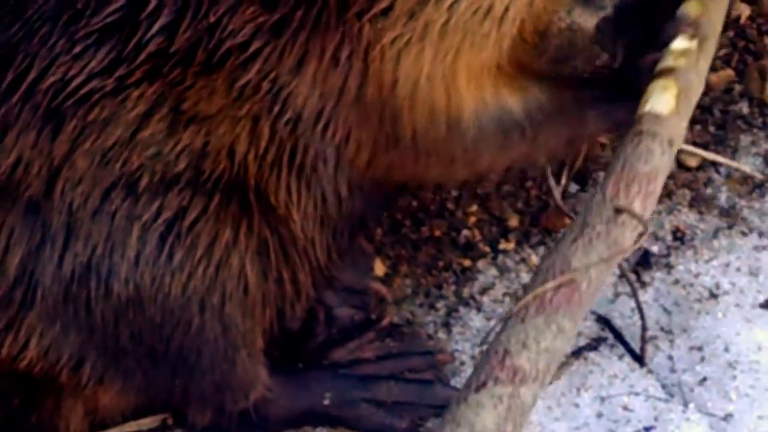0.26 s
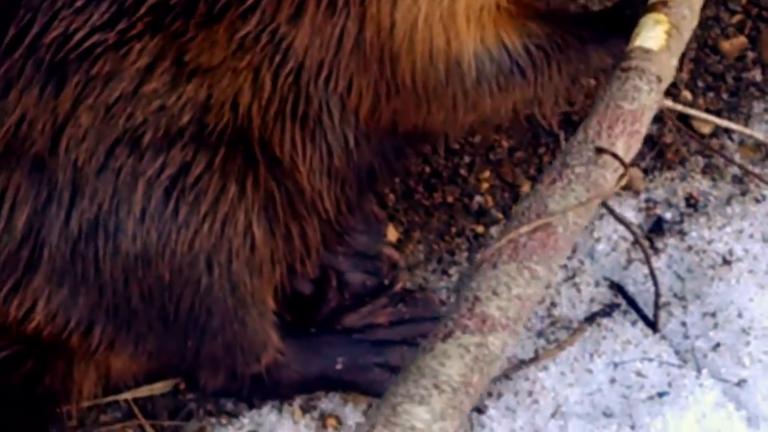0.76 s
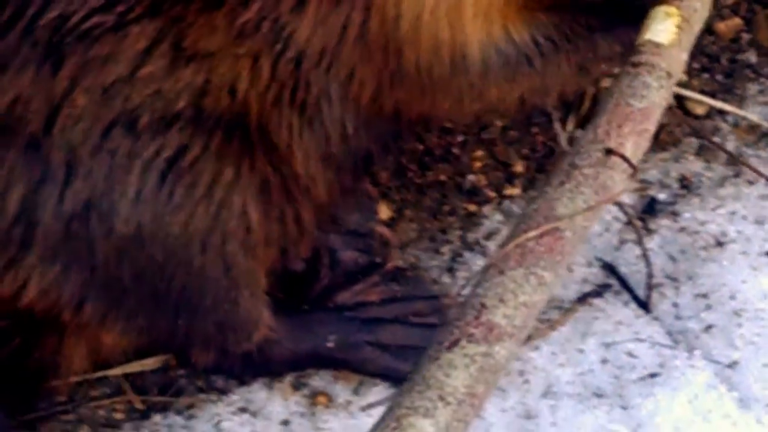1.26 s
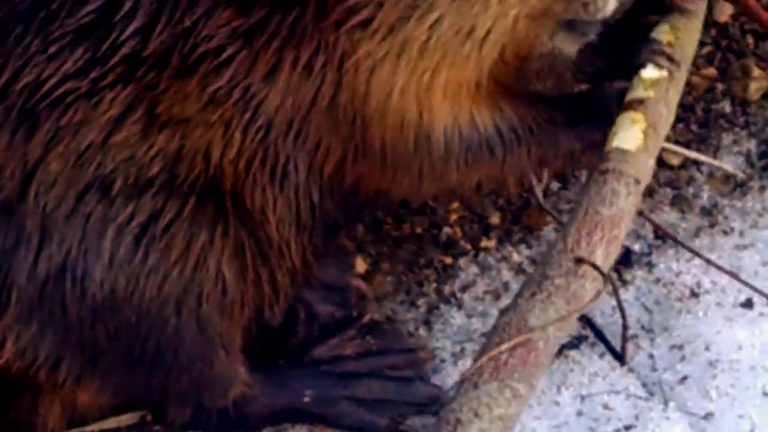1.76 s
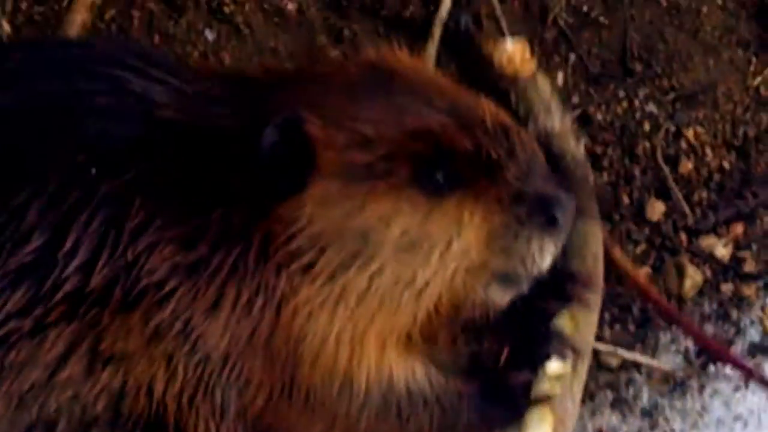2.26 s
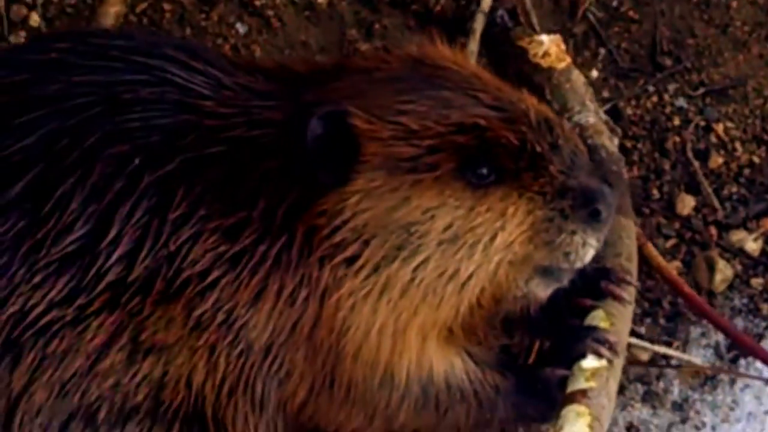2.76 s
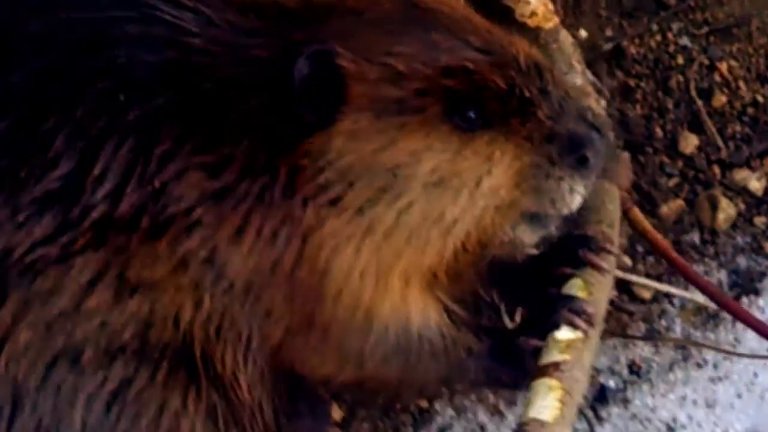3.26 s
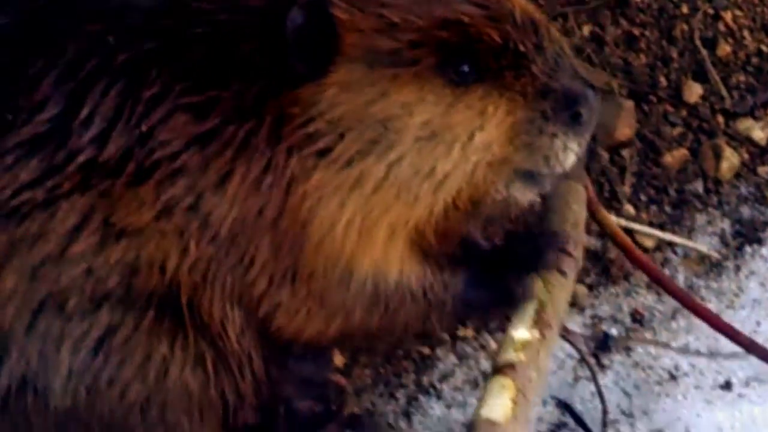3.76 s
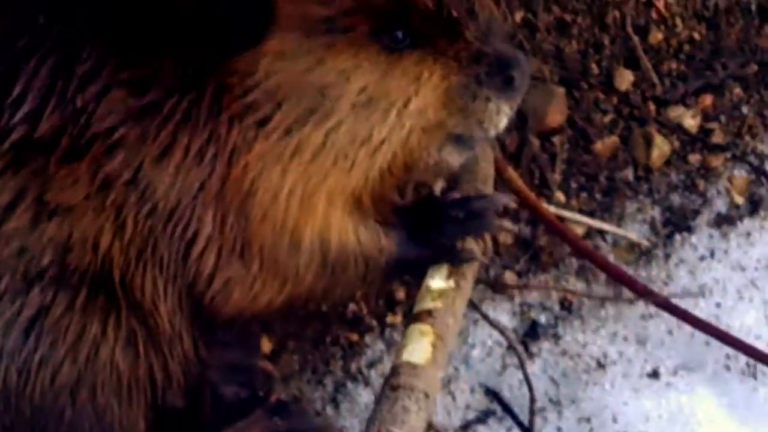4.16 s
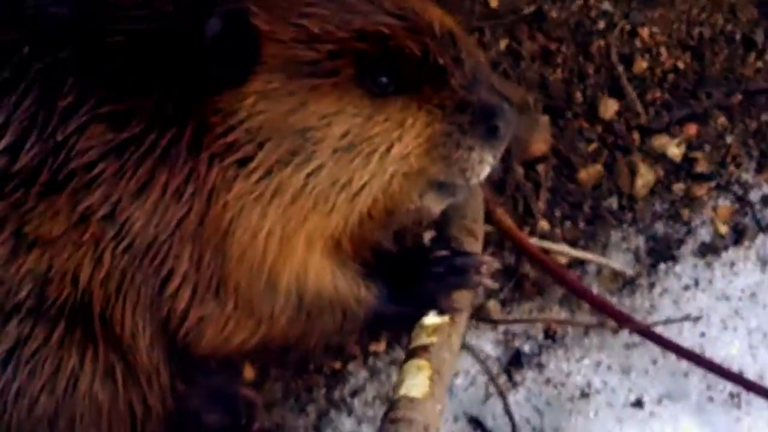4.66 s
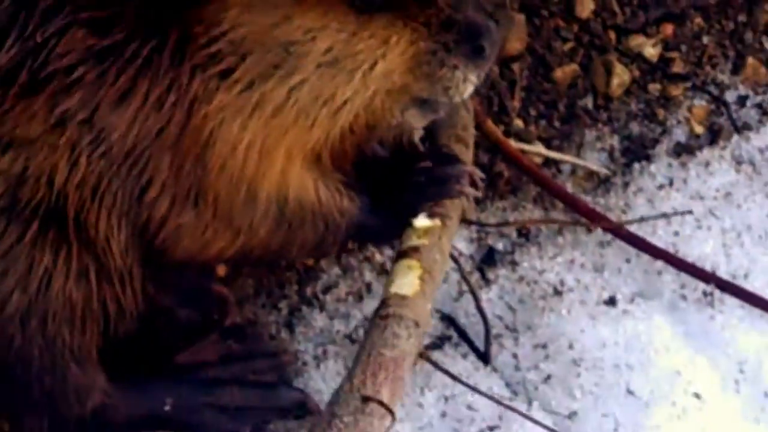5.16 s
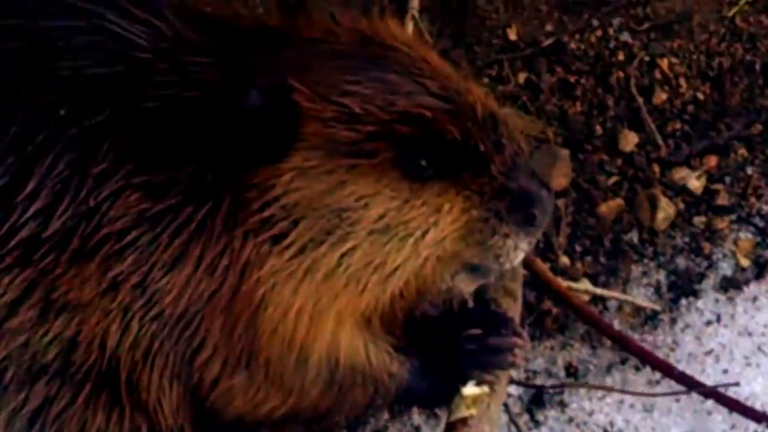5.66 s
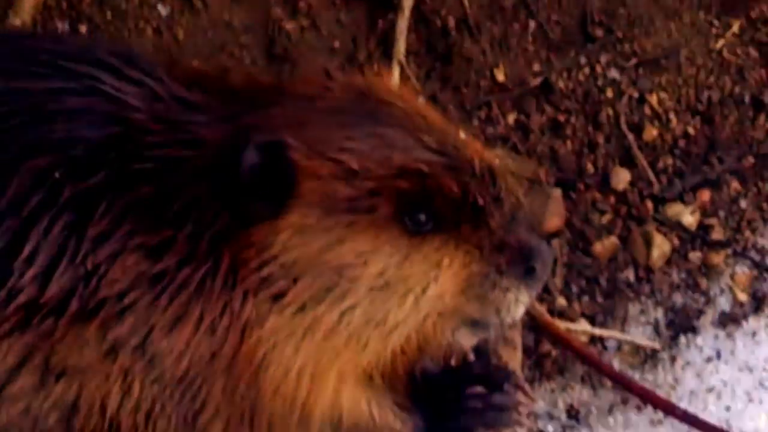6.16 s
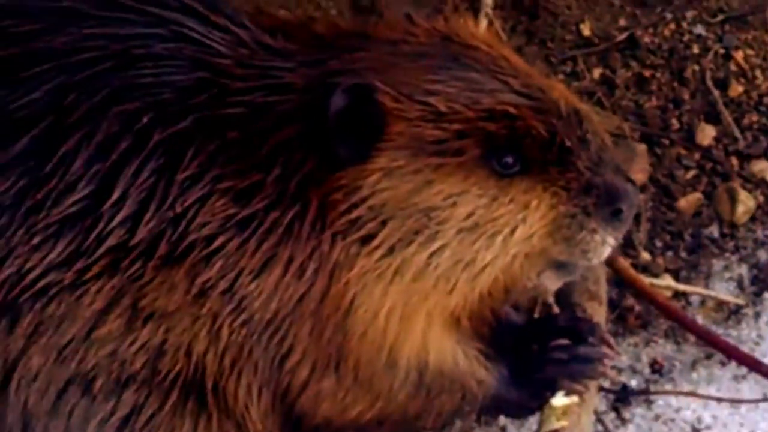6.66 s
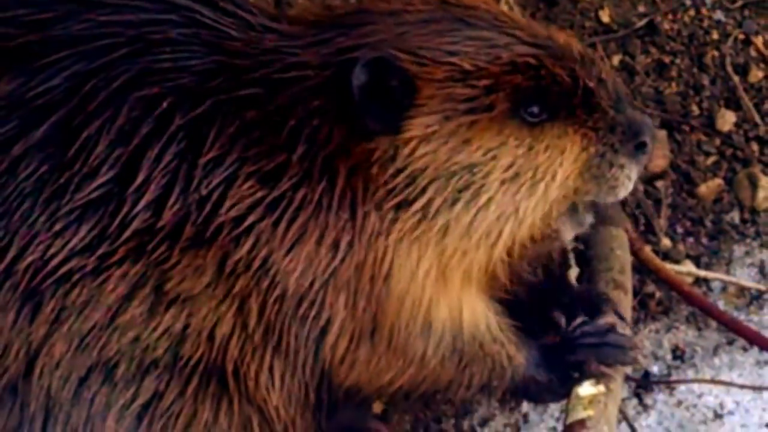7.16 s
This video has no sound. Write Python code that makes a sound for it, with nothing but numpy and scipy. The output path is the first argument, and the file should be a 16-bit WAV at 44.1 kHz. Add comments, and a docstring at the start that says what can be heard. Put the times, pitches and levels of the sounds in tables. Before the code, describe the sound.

Close to the microphone, a beaver gnaws a branch on a snowy bank. A soft quick tearing opens, then mostly quiet with tiny ticks. Midway comes a dense run of bright, dry crunches and snaps, followed by smaller nibbles and scattered tooth clicks. Behind it lie steady hiss, low rumble, a wavering far engine and a few faint bird chirps. Open air, nearly no echo.

```python
"""Crunching, snapping and clicking, close by: a beaver gnaws the bark of a branch on a snowy bank.
Each bite tears a run of tiny random fibre breaks; larger bundles snap in ragged bursts.
Teeth and claws click as impulses with a brief ring; breaks and clicks also drive the branch's resonances.
Behind: a few faint gliding bird chirps, a far engine's tones with a whine and drone in narrow noise,
a brief early low swell with a weaker return, a rumble, distant noise and steady outdoor hiss."""
import sys
import numpy as np
from scipy import signal
from scipy.fft import rfft, irfft, next_fast_len
from scipy.io import wavfile

SR = 44100
rng = np.random.default_rng(int(sys.argv[2]) if len(sys.argv) > 2 else 0)


def wrap_up_sound(samples):
    """Save the sound to the file named by the first command line argument, as 16-bit audio."""
    columns = np.atleast_2d(samples).T
    # keep every value between -1 and 1, then stretch to whole-number steps
    tamed = np.clip(columns, -1, 1)
    steps = np.round(tamed * 32767).astype(np.int16)
    wavfile.write(sys.argv[1], SR, steps)


N = 326781
TIME = np.arange(N) / SR
SIZE = next_fast_len(N + SR // 2, True)
HZ = np.maximum(np.arange(SIZE // 2 + 1) * SR / SIZE, 1)
LEFT_DB, LEFT_LOW_DB = -2, -3.5  # left channel: beaver, most of the background


# fibre snaps: [t/s, relative crack level/dB, relative branch level/dB]
SNAPS = [(0.159, -42, -33), (0.164, -38, -44), (0.1725, -28, -32.5), (0.1755, -36, -28.5),
         (0.182, -43, -46), (0.236, -48, -43), (0.2573, -48, -53), (0.3124, -48.5, -44), (0.3444, -49, -47),
         (0.3745, -42.5, -54), (2.0408, -42, -68), (3.1861, -40, -52.5), (3.2072, -34, -59),
         (3.2668, -47, -41), (3.3636, -47.5, -58), (3.405, -34, -33), (3.4113, -34, -40),
         (3.4185, -28, -37), (3.4317, -36, -46), (3.4378, -19.5, -26.5), (3.4446, -33, -32),
         (3.4578, -23, -25), (3.4676, -31, -34), (3.4821, -32, -39), (3.4923, -28, -39), (3.5077, -33, -42),
         (3.537, -43, -45), (3.547, -38, -50), (3.555, -33, -48), (3.5754, -28.5, -47), (3.5974, -35, -30),
         (3.604, -38, -27), (3.611, -31, -40), (3.6304, -28, -48), (3.6551, -28, -45), (3.6695, -25, -40),
         (3.6819, -34, -36), (3.7151, -23, -40), (3.7215, -28, -38), (3.73, -30, -28.5),
         (3.7674, -26.5, -34.5), (3.787, -40, -55), (3.8281, -46, -48), (3.8402, -46, -56),
         (3.8577, -43, -54), (3.8713, -25, -51), (3.8892, -31, -34.5), (3.9044, -28.5, -37),
         (3.9149, -26, -34), (3.9225, -20, -39), (3.935, -31, -43), (3.9675, -41, -49), (3.9902, -34, -35),
         (3.997, -17.5, -30), (4.035, -22, -31), (4.0551, -32, -54), (4.0666, -26, -46), (4.0732, -31, -47),
         (4.0925, -42, -47), (4.116, -19.5, -34.5), (4.1462, -22.5, -38), (4.22, -22, -44),
         (4.256, -31, -42), (4.2735, -23, -45), (4.2852, -37, -44), (4.2984, -39, -54), (4.3255, -25, -33),
         (4.337, -18, -31), (4.361, -27, -41.5), (4.3803, -25, -49), (4.404, -27, -33),
         (4.4171, -27, -37.5), (4.4297, -38, -40), (4.4653, -32, -49), (4.4752, -33, -41),
         (4.483, -32, -54), (4.5068, -44, -52), (4.535, -42, -57), (4.558, -37, -42), (4.5798, -23.5, -32),
         (4.587, -33, -42), (4.6218, -32, -47), (4.6517, -42, -57), (4.673, -29, -44), (4.6868, -36, -46),
         (4.6942, -30, -40), (4.7245, -41, -50), (4.7342, -37, -53), (4.7691, -38, -52),
         (4.7845, -27.5, -44.5), (5.1002, -38, -42), (5.1109, -40, -56), (5.1255, -37, -43),
         (5.1425, -45, -42), (5.1756, -44, -55), (5.1875, -25, -37), (5.197, -29, -50), (5.2874, -38, -57),
         (5.3135, -32, -46), (5.3326, -45, -53), (5.3403, -37, -37), (5.3488, -30, -44)]
# teeth and claws on wood: [t/s, relative crack level/dB, relative branch level/dB, ring f/Hz]
CLICKS = [(0.0961, -37, -57, 6120), (0.1122, -37, -48, 6060), (0.117, -41, -55, 8400),
          (0.1246, -46, -58, 6600), (0.4776, -46, -47, 6900), (0.7605, -41.5, -64, 7920),
          (0.9783, -41, -57, 9300), (1.0045, -42, -59, 7410), (1.0998, -31.5, -63, 9470),
          (1.1168, -42, -65, 9000), (1.3584, -46, -58, 8800), (1.8176, -50, -68, 7050),
          (2.0581, -43, -62, 5080), (2.1721, -41, -69, 9130), (2.62, -45, -49, 7300),
          (2.9688, -44.5, -70, 9470), (3.077, -39, -50, 9900), (3.1228, -40.5, -60, 9500),
          (3.2884, -35, -44, 7200), (3.324, -37, -52, 6900), (4.9547, -43, -65, 8000),
          (4.9712, -40, -51, 7560), (5.262, -33, -38.5, 7960), (5.2778, -26.5, -44, 8100),
          (5.297, -35, -41, 7700), (5.5825, -42, -57, 8300), (5.7078, -42, -56, 9500),
          (5.9565, -41, -58, 6460), (6.0125, -43, -58, 7800), (6.0398, -36, -50, 5000),
          (6.125, -53, -48, 2600), (6.5946, -49.5, -62, 9000), (6.908, -47, -61, 8500),
          (6.938, -37, -53, 9130), (6.9531, -34, -51, 6550), (6.9676, -26.5, -27, 6340),
          (7.226, -32.5, -48, 6450), (7.2873, -42, -65, 6260), (7.3673, -48, -64, 9000)]
# colour of breaking fibres: [f/Hz, relative level/dB]
FIBRE_COLOUR = [(1200, -10.5), (2200, -23), (4000, -21.5), (6300, -16.5), (8000, -11.5), (10000, -5.5),
                (12000, 1), (13300, 3.5), (14700, 9), (15400, 9.5), (15800, -39), (16200, -80)]
# branch resonances: [f/Hz, width/Hz, relative level/dB]
BRANCH_MODES = [(1610, 760, 8), (2268, 120, 12.5), (2870, 170, 10.5), (4100, 8700, 2.5), (6680, 2500, 10),
                (9300, 490, 11.5), (3210, 54, 6), (3350, 63, 5), (3835, 43, 8), (4000, 20, 5),
                (4240, 74, 9), (4530, 52, 9), (5760, 95, 5.5), (7210, 99, 15)]
TEAR_DB, SNAP_DB, CLICK_DB = 1.2, -0.5, 13.5  # heard directly
SNAP_PUSH_DB, CLICK_PUSH_DB = -8, 8  # through the branch
SLIVER_DB, SPLIT_DB = -16.5, -23  # ringing slivers: under branch level, under crack level
SCATTER_CRACK_DB = -5.5
WOOD_CUT_HZ = 9200  # the soft branch loses the highest treble


def beaver(scatter_db):
    """All breaks sound directly and also shake the branch."""
    force, shake = jaw()
    tear = tearing(force)
    bundles = np.vstack([SNAPS, thin_snaps(force)])
    snap, snap_push = snaps(bundles)
    contacts = np.vstack([CLICKS, ticks()])
    click, click_push, rings = clicks(contacts, splinter_s=.0011, splinter_db=-10, ring_s=0.0005, ring_db=11)

    cracks = from_db(TEAR_DB) * force * tear + from_db(SNAP_DB) * snap
    pushes = shake * tear + from_db(SNAP_PUSH_DB) * snap_push
    click = from_db(CLICK_DB) * click
    click_push = from_db(CLICK_PUSH_DB) * click_push

    s, crack_db, branch_db = bundles.T
    slivers = splinters(s, branch_db + SLIVER_DB, low_hz=1900, high_hz=7000, t60=.03, count=5)
    slivers += splinters(s, crack_db + SPLIT_DB, low_hz=11300, high_hz=13600, t60=.035)

    fibre = causal(FIBRE_COLOUR)
    softness = 1 + 1j * HZ / WOOD_CUT_HZ - (HZ / WOOD_CUT_HZ) ** 2
    branch = resonances(BRANCH_MODES) / softness
    bark = tinted(through(cracks, fibre), step_hz=1500, spread_db=2.8, change_hz=50)
    wood = tinted(through(pushes, branch), step_hz=300, spread_db=4.5, change_hz=14)
    knocks = through(click, fibre) + through(click_push, branch) + rings
    direct = pair(bark + wood + slivers + knocks, LEFT_DB)

    sides = []
    for _ in "LR":
        crack_tail = from_db(SCATTER_CRACK_DB) * through(scattered(cracks + click), fibre)
        branch_tail = through(scattered(pushes + click_push), branch)
        sides.append(crack_tail + branch_tail)
    return direct + from_db(scatter_db) * np.array(sides)


# tooth strokes: [full grip t/s, length/s, force level/dB, force lost by the end/dB, branch re force/dB]
BITES = [(0.087, 0.035, -54, 2, -8), (0.144, 0.26, -48, 8.5, -10.5), (0.934, 0.064, -59, -4, -17),
         (1.123, 0.13, -57.5, -2, -11), (1.965, 0.12, -52.5, 8, -10.5), (3.197, 0.014, -44, -1, -18),
         (3.224, 0.21, -54, 0.5, -8.5), (3.4, 0.066, -35, -5, -9), (3.47, 0.17, -40.5, -4, -12.5),
         (3.592, 0.023, -28.5, -1.5, -14), (3.662, 0.068, -38, 3.5, -13), (3.723, 0.041, -29, 7.5, -13.5),
         (3.778, 0.15, -45, 0, -15.5), (3.914, 0.024, -30.5, 1, -12.5), (3.94, 0.14, -36, -3, -13),
         (4.11, 0.091, -36.5, 14, -10), (4.216, 0.095, -34.5, 6.5, -13.5),
         (4.321, 0.11, -28.5, 12.5, -17.5), (4.425, 0.092, -38, 9.5, -17), (4.553, 0.079, -36.5, 5.5, -15),
         (4.665, 0.19, -45.5, 7, -9), (4.91, 0.025, -55.5, 0, -11), (4.962, 0.096, -50.5, 6, -7),
         (5.084, 0.092, -46, 7, -10), (5.186, 0.012, -36, 0, -15), (5.247, 0.073, -55, 0, -18),
         (5.34, 0.036, -42, 8.5, -8), (5.528, 0.096, -58.5, -4, -15), (6.04, 0.15, -54, 9, -9),
         (6.76, 0.06, -62, 0, -14), (6.934, 0.032, -44.5, 1, -12), (7.22, 0.18, -60.5, 2, -4.5)]
BITE_ATTACK_S, BITE_RELEASE_S = 0.0046, 0.011
CHEW_DB, CHEW_SHAKE_DB = -66.5, -5  # quiet chewing between strokes: force, branch re force


def jaw():
    """Strokes catch, hold with a steady change of force and let go: force on bark, and on branch."""
    force = np.full(N, from_db(CHEW_DB))
    shake = force * from_db(CHEW_SHAKE_DB)
    for s, length, db, lost_db, shake_db in BITES:
        t = TIME - s
        catch = np.clip(1 + t / BITE_ATTACK_S, 0, 1)
        release = np.exp(-np.clip((t - length) / BITE_RELEASE_S, 0, 20))
        stroke = catch * release * from_db(db - lost_db * np.clip(t / length, 0, 1))
        force = np.maximum(force, stroke)
        shake = np.maximum(shake, stroke * from_db(shake_db))
    return force, shake


MAX_FIBRES_PER_S, CLUMP_DB, CLUMP_HZ = 4200, 3.4, 320
DENSITY_POWER = .7  # break rate ~ force ** this


def tearing(force):
    """Harder biting breaks more fibres; they give way in clumps."""
    clumps = rms_one(from_db(CLUMP_DB * drift(CLUMP_HZ)))
    per_s = MAX_FIBRES_PER_S * (force / force.max()) ** DENSITY_POWER
    return clumps * fractures(per_s, spread_db=2.2)


def fractures(per_s, spread_db):
    """Random tiny breaks of uneven size and either sign; rms 1."""
    sizes = from_db(spread_db * np.minimum(rng.exponential(1, N), 4))
    breaks = rng.random(N) < per_s / SR
    # the root evens out power where breaks are dense
    return rms_one(breaks * sizes * rng.choice([-1, 1], N) / np.sqrt(per_s))


SNAP_DECAY_S, RAGGED_DB = .0028, 6


def snaps(rows):
    """A bundle fails in a quick, ragged cascade of breaks: the crack, and the push on the branch."""
    crack, push, t = np.zeros(N), np.zeros(N), TIME[:SR // 50]
    shape = np.exp(-(t / SNAP_DECAY_S) ** 2)
    for s, crack_db, branch_db in rows:
        breaks = rng.choice([-1, 1], len(t)) * from_db(RAGGED_DB * rng.uniform(-1.2, 1, len(t)))
        burst = rms_one(shape * breaks) * np.sqrt(np.mean(shape ** 2))
        add(crack, s, from_db(crack_db) * burst)
        add(push, s, from_db(branch_db) * burst)
    return crack, push


THIN_PER_S, THIN_DB, THIN_SPREAD_DB, THIN_SHAKE_DB = 40, -2, 0.5, -8


def thin_snaps(force):
    """Chance snaps of thin bundles, as strong as the teeth pull at that moment; rows like SNAPS."""
    s = by_chance(THIN_PER_S)
    pull_db = 20 * np.log10(np.interp(s, TIME, force))
    db = pull_db + THIN_DB + THIN_SPREAD_DB * rng.uniform(-0.89, 1, 1000)[:len(s)]
    return np.column_stack([s, db, db + THIN_SHAKE_DB])


# ring of a click: [multiple of its pitch, relative level/dB]
CLICK_MODES = [(.46, -13), (1, 0), (1.42, -7)]


def clicks(rows, splinter_s, splinter_db, ring_s, ring_db):
    """A hard contact: one impulse, a trail of splinters and a brief ring."""
    crack, push, rings, t = np.zeros(N), np.zeros(N), np.zeros(N), TIME[:SR // 60]
    for s, crack_db, branch_db, hz in rows:
        trail = rng.standard_normal(len(t)) * np.exp(-t / splinter_s)
        blow = (t == 0) + from_db(splinter_db) * trail
        add(crack, s, from_db(crack_db) * blow)
        add(push, s, from_db(branch_db) * blow)
        tone = sum(from_db(db) * np.sin(2 * np.pi * multiple * hz * t) for multiple, db in CLICK_MODES)
        add(rings, s, from_db(branch_db + ring_db) * tone * np.exp(-t / ring_s))
    return crack, push, rings


TICKS_PER_S, TICK_DB, TICK_SPREAD_DB, TICK_SHAKE_DB, TICK_HZ = 6, -57, 3.5, -8, 8500


def ticks():
    """Chance ticks of chewing, each of its own size and pitch; rows like CLICKS."""
    s = by_chance(TICKS_PER_S)
    size, pitch = rng.standard_normal((1000, 2))[:len(s)].T
    db = TICK_DB + TICK_SPREAD_DB * size
    return np.column_stack([s, db, db + TICK_SHAKE_DB, TICK_HZ * (1 + pitch / 10)])


def splinters(s, db, low_hz, high_hz, t60, count=3):
    """Each snap leaves a few slivers of wood ringing, at pitches of their own."""
    out, t = np.zeros(N), TIME[:SR // 15]
    pitches = low_hz * (high_hz / low_hz) ** rng.random((1000, count))
    for start, level_db, hz in zip(s, db, pitches):
        tones = np.sin(2 * np.pi * np.outer(hz, t)).sum(axis=0)
        add(out, start, from_db(level_db - 60 * t / t60) * tones)
    return out


def tinted(x, step_hz, spread_db, change_hz, count=8):
    """No two fibres or branch spots are alike: patches of the colour swell and fade by chance."""
    centres = np.arange(0, SR / 2, step_hz)
    spectrum, out = rfft(x, SIZE), 0
    dealt = rng.permutation(len(centres)) % count
    for k in range(count):
        patches = np.interp(HZ, centres, dealt == k)
        gain = rms_one(from_db(spread_db * drift(change_hz)))
        out = out + irfft(spectrum * patches, SIZE)[:N] * gain
    return out


SCATTER_T60_S = .012


def scattered(breaks):
    """Every break radiates its own way; off ground and fur it returns as a brief noise tail."""
    keep = from_db(-120 / (SCATTER_T60_S * SR))  # power decay per sample
    power = signal.lfilter([1 - keep], [1, -keep], breaks ** 2 + 1e-18)
    return np.sqrt(power) * rng.standard_normal(N)


def echoes(x, t60):
    """Dense weak reflections from the trees, different on each side."""
    t = TIME[:SR // 2]
    tail = rng.standard_normal((2, len(t))) * from_db(-60 * t / t60)
    return signal.fftconvolve(x[None], tail / np.sqrt(np.sum(tail ** 2) / 2), axes=1)[:, :N]


# far birds: [t/s, length/s, first f/Hz, middle f/Hz, last f/Hz, relative level/dB, hoarseness/share of f]
CHIRPS = [(0.452, 0.044, 6270, 6600, 6520, -48, 0.0048), (0.53, .035, 5450, 5650, 5600, -60, .02),
          (0.616, 0.049, 4660, 4630, 4600, -52, 0.012), (0.689, 0.057, 5300, 5000, 4400, -55, .07),
          (1.0, .05, 7000, 7500, 7300, -61, .03), (1.132, 0.041, 6300, 6300, 5370, -56, .02),
          (1.25, .05, 5560, 5630, 5500, -58, .035), (1.622, 0.089, 7060, 7180, 5640, -54, 0.013),
          (2.54, .04, 8900, 9160, 9300, -60, .008), (2.818, 0.055, 7100, 7460, 7700, -65, .015),
          (3.228, 0.056, 6440, 6560, 6570, -57, 0.01), (4.952, 0.06, 4630, 4720, 4760, -53, 0.025),
          (5.86, 0.086, 7050, 7000, 5300, -53, 0.01), (6.016, 0.076, 3850, 3920, 3820, -60.5, 0.015),
          (6.257, 0.053, 8500, 8800, 8900, -67, .012), (6.618, 0.028, 6400, 6650, 6500, -52, .006),
          (6.679, 0.029, 5060, 5700, 6000, -52.5, 0.025), (6.765, 0.057, 4540, 4650, 4820, -50, .012),
          (6.807, 0.065, 7150, 7270, 7330, -55, .005), (6.827, 0.086, 5000, 5170, 4900, -54.5, 0.076),
          (6.94, 0.089, 6500, 7130, 7080, -51, 0.0038), (7.085, 0.047, 4840, 5720, 6350, -50.5, 0.08),
          (7.158, 0.052, 4650, 5500, 6330, -52, 0.1), (7.255, 0.12, 3510, 3510, 3480, -59, 0.027)]


def birds(flutter_db):
    """Thin whistles, clear or hoarse, each an arch through three pitches."""
    out, quiver = np.zeros(N), drift(390)
    for s, length, first, middle, last, db, hoarse in CHIRPS:
        u = np.linspace(0, 1, int(length * SR))
        arch = np.polyval(np.polyfit([0, .5, 1], [first, middle, last], 2), u)
        hz = arch * (1 + hoarse * np.interp(s + u * length, TIME, quiver))
        swell = np.sqrt(abs(np.sin(np.pi * u)))
        add(out, s, from_db(db) * swell * np.sin(2 * np.pi * np.cumsum(hz) / SR))
    return out * from_db(flutter_db * drift(41))


# far engine: [t/s, firing tone level/dB, third order level/dB, fourth order level/dB], before flutter
ENGINE_LEVELS = [(0.0, -71, -70, -59), (1.0, -56.5, -66, -74), (1.5, -63, -64, -62.5),
                 (1.9, -70, -65.5, -70), (2.3, -51.5, -65.5, -64), (2.9, -69, -65, -76),
                 (3.3, -46, -63.5, -68), (3.7, -51, -60, -60), (4.15, -49.5, -77, -58),
                 (4.9, -52.5, -69, -59), (5.6, -52.5, -62, -68), (6.05, -61, -75, -64),
                 (6.25, -51, -73, -62), (7.41, -74, -69, -79)]
ENGINE_MEAN_HZ, ENGINE_ORDERS = 81, (1, 3, 4)


def engine(waver, flutter_db):
    """A far motor's firing tone and two overtones, wavering and fading on their way."""
    turn = 2 * np.pi * np.cumsum(ENGINE_MEAN_HZ * (1 + waver * drift(1.12))) / SR
    out = np.zeros(N)
    for order, db in zip(ENGINE_ORDERS, in_time(ENGINE_LEVELS)):
        out += from_db(db + flutter_db * drift(14)) * np.sin(order * turn)
    return np.sqrt(2) * out


# faint distant whine that soon fades: [t/s, level/dB]
WHINE_LEVEL = [(0, -54.5), (.4, -57.5), (.76, -54.5), (.92, -67), (1.6, -91)]
# its band: [f/Hz, width/Hz, relative level/dB]
WHINE_BAND = [(868, 70, 0)]
# distant drone that comes and goes: [t/s, relative level/dB]
DRONE_LEVEL = [(0.0, -54.5), (0.8, -59), (1.7, -58), (2.0, -53.5), (2.6, -66), (2.9, -63), (3.15, -51.5),
               (3.5, -56), (3.83, -66), (3.97, -52), (4.3, -53.5), (4.75, -65), (5.3, -53.5), (5.85, -56),
               (5.97, -74), (6.25, -53), (7.41, -73)]
# its band: [f/Hz, width/Hz, relative level/dB]
DRONE_BAND = [(381.3, 113, 0)]
DRONE_DB = 1


def machines():
    """A whine and a drone in narrow noise and an engine in tones, all far off."""
    whine = narrow_noise(WHINE_LEVEL, WHINE_BAND)
    drone = from_db(DRONE_DB) * narrow_noise(DRONE_LEVEL, DRONE_BAND)
    return whine + drone + engine(waver=0.00686, flutter_db=3.0)


def narrow_noise(level, band):
    """A far sound that arrives as one band of noise."""
    return from_db(in_time(level)[0]) * through(rng.standard_normal(N), resonances(band) ** 2)


# noise colours: [f/Hz, relative level/dB per Hz]
DISTANCE_COLOUR = [(90, -1), (170, -2), (260, -4.5), (370, -2.5), (520, -2), (800, 0.5), (1050, -3.5),
                   (1500, -6.5), (2000, -11.5), (2700, -26), (4500, -31), (9000, -48)]
RUMBLE_COLOUR = [(12, -36), (28, 3), (45, 11), (65, 12.5), (95, 4), (130, -6), (250, -35.5)]
HISS_COLOUR = [(1500, -2), (3000, 6.5), (5000, 0), (8000, 1.5), (11000, 2.5), (13000, 5.5), (14200, 10),
               (15300, -10), (16000, -49)]
# distant noise and low rumble: [t/s, relative level/dB]
FAR_NOISE_LEVEL = [(0.0, -50.5), (0.6, -51.5), (1.03, -53.5), (1.59, -53.5), (3.14, -52.5), (3.44, -50.5),
                   (4.58, -49.5), (5.84, -51.5), (6.83, -51), (7.41, -52.5)]
RUMBLE_LEVEL = [(0.05, -59.5), (0.6, -58.5), (0.8, -54), (0.95, -58), (1.27, -52), (1.9, -63), (2.28, -57),
                (2.8, -62.5), (3.3, -54.5), (3.7, -56), (3.97, -67), (4.11, -54.5), (5.12, -60.5),
                (5.24, -53.5), (5.36, -63), (5.46, -55), (5.65, -53), (6.03, -57.5), (6.25, -55.5),
                (6.6, -58.5), (7.35, -58)]
# brief low swell near 0.8 s, with a weaker return near 1.7 s: [t/s, level/dB]
SWELL_LEVEL = [(0.0, -87), (.62, -67), (.8, -47), (.95, -52), (1.3, -67), (1.7, -58), (2.3, -88)]
# its band: [f/Hz, width/Hz, relative level/dB]
SWELL_BAND = [(104, 63, 0)]
FAR_NOISE_DB, RUMBLE_DB, HISS_DB = 4.5, 5, -60.5
RUMBLE_SWELL_DB, RUMBLE_SWELL_HZ = 1.0, 19


def open_air():
    """Distant noise, a brief low swell and its return, a rumble swelling by chance and an even hiss."""
    far = from_db(in_time(FAR_NOISE_LEVEL)[0] + FAR_NOISE_DB) * diffuse(DISTANCE_COLOUR, LEFT_LOW_DB)
    rumble_db = in_time(RUMBLE_LEVEL)[0] + RUMBLE_DB + RUMBLE_SWELL_DB * drift(RUMBLE_SWELL_HZ)
    swell = pair(narrow_noise(SWELL_LEVEL, SWELL_BAND), LEFT_LOW_DB)
    rumble = from_db(rumble_db) * diffuse(RUMBLE_COLOUR, left_db=-2.5)
    hiss = from_db(HISS_DB) * diffuse(HISS_COLOUR, left_db=0.55)
    return far + swell + rumble + hiss


# likeness of the two channels: [f/Hz, shared power/0..1]
LIKENESS = [(40, 0.43), (85, 0.91), (170, 0.46), (260, 0.25), (350, 0.54), (600, 0.54), (950, 0.084),
            (1300, 0.8), (2000, 1), (8000, 0.7), (14000, 0.22)]


def diffuse(spectrum, left_db):
    """Noise from all around, only partly shared by the two channels."""
    colour = from_db(at_hz(spectrum))
    alike = np.clip(at_hz(LIKENESS), 0, 1)
    shared, *own = rfft(rng.standard_normal((3, SIZE))) * colour / np.sqrt(np.mean(colour ** 2))
    common = pair(irfft(shared * np.sqrt(alike), SIZE)[:N], 0)
    separate = irfft(np.array(own) * np.sqrt(1 - alike), SIZE)[:, :N]
    return (common + separate) * from_db([[left_db], [0]])


# left channel phase lag in the bass: [f/Hz, lag/rad]
BASS_PHASE = [(40, 0.5), (150, 2.5), (260, 0.78), (360, -1.03), (1275, -0.0033)]
LEFT_LAG_S, IN_STEP_HZ = 1 / 2550, 1275


def pair(x, left_db):
    """Stereo pickup: left phase follows a curve in the bass, a fixed group delay above IN_STEP_HZ."""
    phase = at_hz(BASS_PHASE) + 2 * np.pi * LEFT_LAG_S * np.maximum(HZ - IN_STEP_HZ, 0)
    left = irfft(rfft(x, SIZE) * np.exp(-1j * phase), SIZE)[:N]
    return np.array([from_db(left_db) * left, x])


def from_db(db):
    """Decibels to gain."""
    return 10 ** (np.asarray(db) / 20)


def rms_one(x):
    """Scale to rms 1."""
    return x / np.sqrt(np.mean(x ** 2) + 1e-20)


def in_time(rows):
    """Each column of a curve at every sample."""
    s, *columns = np.transpose(rows)
    return [np.interp(TIME, s, c) for c in columns]


def at_hz(points):
    """A table of (Hz, value) at every frequency, interpolated over log frequency."""
    hz, value = np.transpose(points)
    return np.interp(np.log(HZ), np.log(hz), value)


def drift(corner_hz):
    """Smooth chance of rms 1: low-passed noise."""
    return rms_one(irfft(rfft(rng.standard_normal(SIZE)) / (1 + (HZ / corner_hz) ** 2), SIZE)[:N])


def by_chance(per_s):
    """Moments that fall at random through the scene."""
    return rng.uniform(0, N / SR, 1000)[:int(per_s * N / SR)]


def add(track, s, sound):
    """Lay a short sound into a track."""
    i = int(np.clip(s * SR, 0, N - 1))
    track[i:i + len(sound)] += sound[:N - i]


def through(x, response):
    """Filter so that white noise keeps its power."""
    return irfft(rfft(x, SIZE) * response / np.sqrt(np.mean(abs(response) ** 2)), SIZE)[:N]


def causal(spectrum):
    """Minimum-phase response with the given colour: nothing sounds early."""
    cepstrum = irfft(np.log(from_db(at_hz(spectrum))), SIZE)
    return np.exp(rfft(2 * cepstrum[:SIZE // 2], SIZE))


def resonances(modes):
    """Resonances in parallel, signs alternating."""
    total = 0
    for k, (hz, width, db) in enumerate(modes):
        total = total + (-1) ** k * from_db(db) / (1 + 1j * (HZ ** 2 - hz ** 2) / (HZ * width))
    return total


BIRDS_DB, CHIRP_FLUTTER_DB = -3.3, 2.2
ECHO_DB, SONG_ECHO_DB = -21, -7.5


def scene():
    """The beaver close by, birds and machines far off, open air all around."""
    gnawing = beaver(scatter_db=-5.0)
    near = gnawing + from_db(ECHO_DB) * echoes(gnawing[1], t60=0.062)
    chirps = from_db(BIRDS_DB) * birds(CHIRP_FLUTTER_DB)
    song = pair(chirps, LEFT_LOW_DB) + from_db(SONG_ECHO_DB) * echoes(chirps, t60=.2)
    surroundings = pair(machines(), LEFT_LOW_DB) + open_air()
    return near + song + surroundings


CUTOFF_HZ = 16300


def record(dry):
    """A steep elliptic low-pass cuts the top."""
    return signal.sosfilt(signal.ellip(10, .1, 80, CUTOFF_HZ, fs=SR, output="sos"), dry)


dry = scene()
out = record(dry)
wrap_up_sound(out)
```